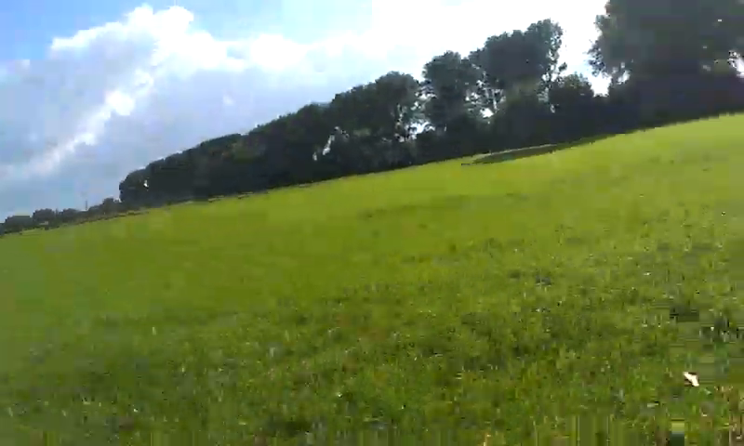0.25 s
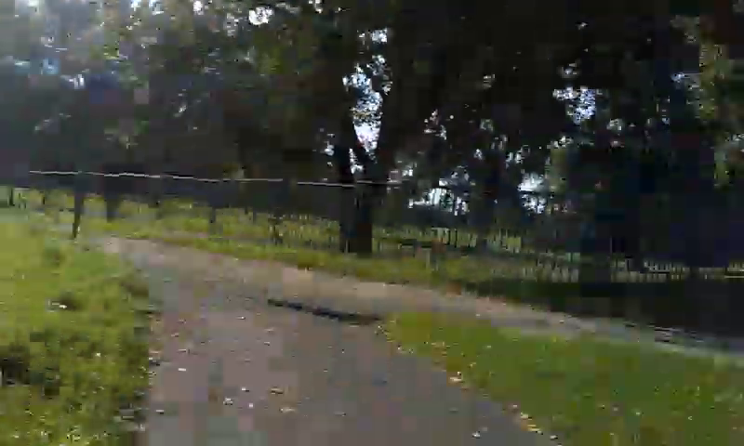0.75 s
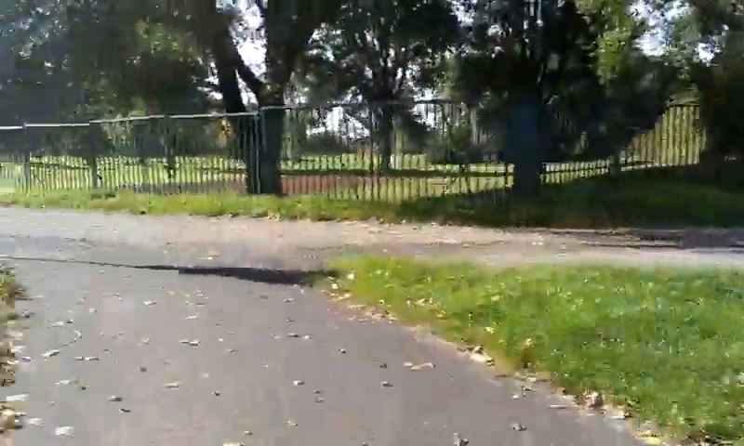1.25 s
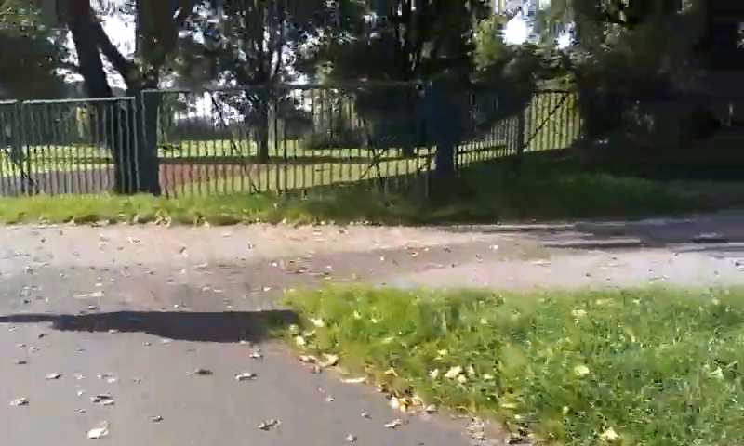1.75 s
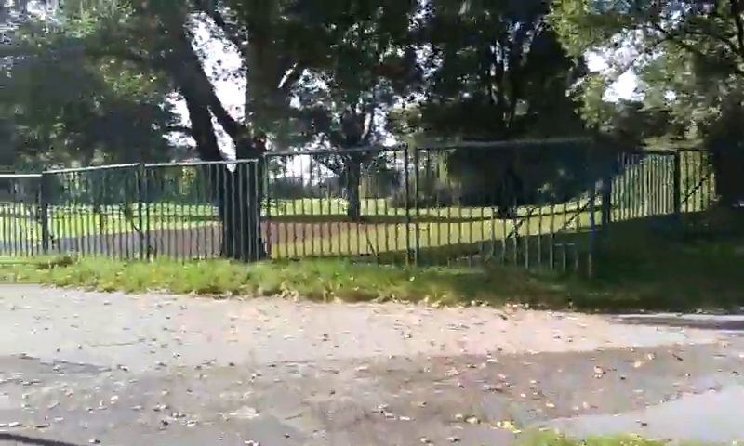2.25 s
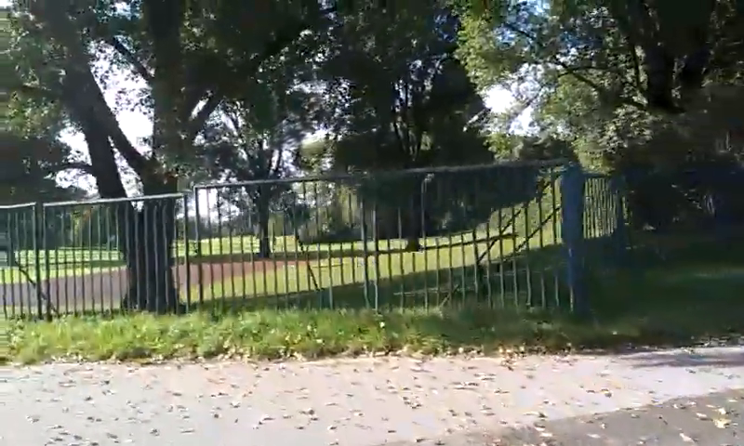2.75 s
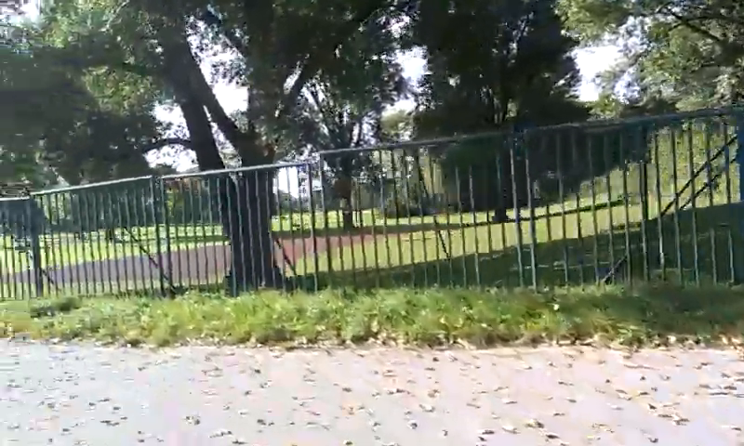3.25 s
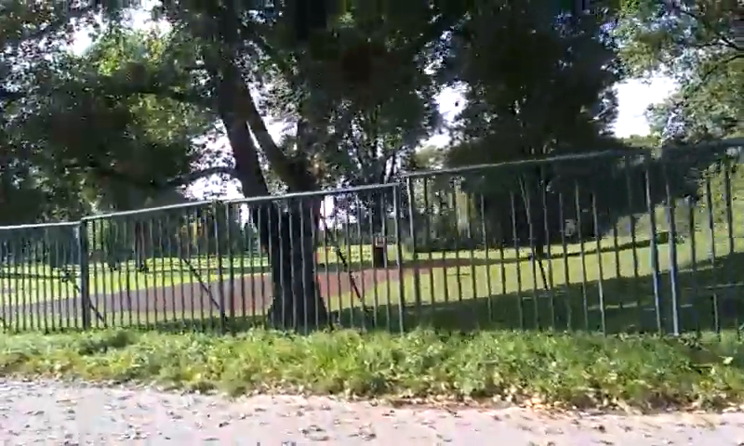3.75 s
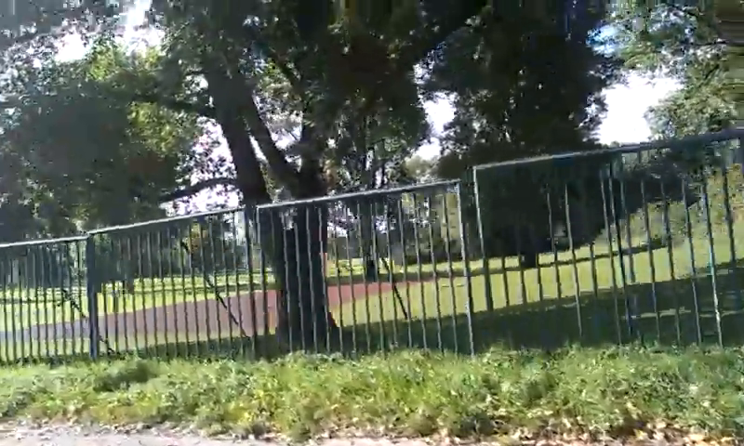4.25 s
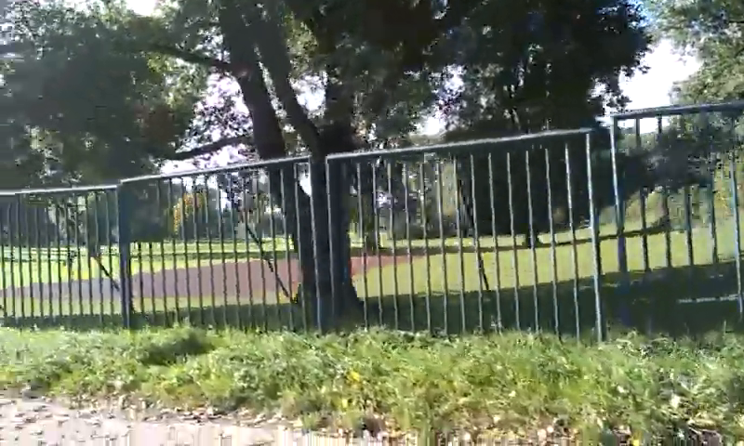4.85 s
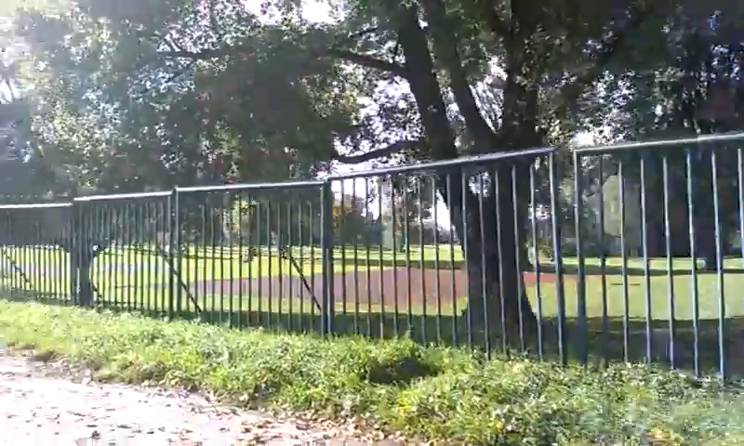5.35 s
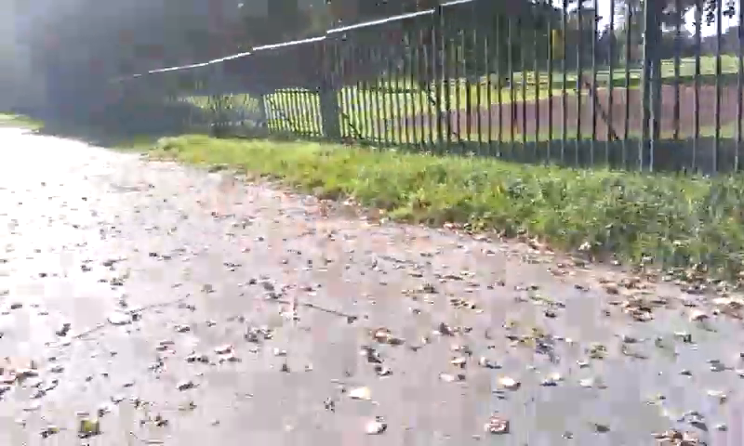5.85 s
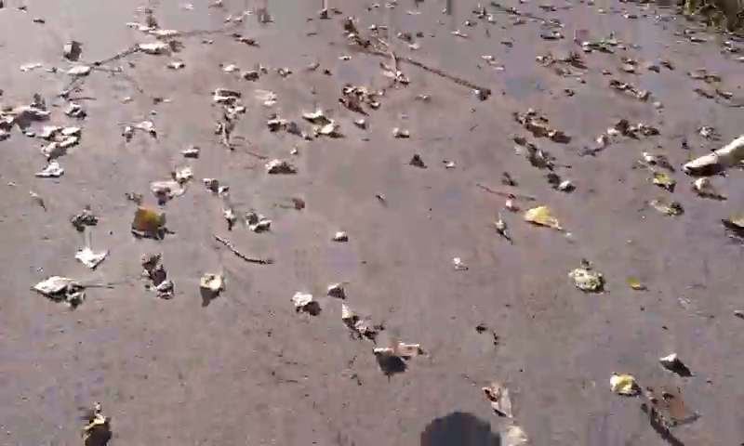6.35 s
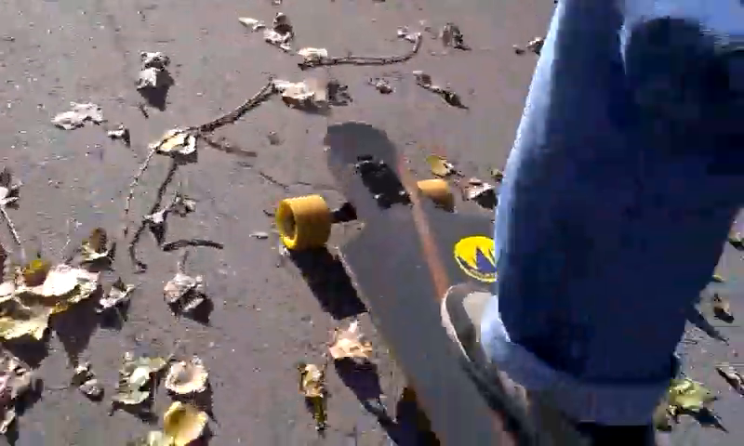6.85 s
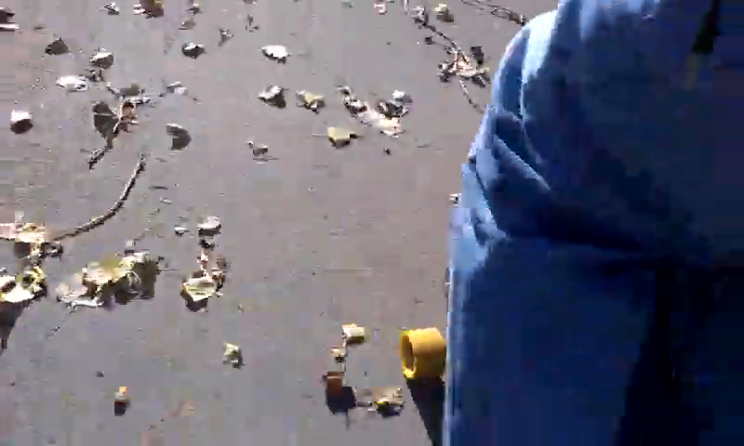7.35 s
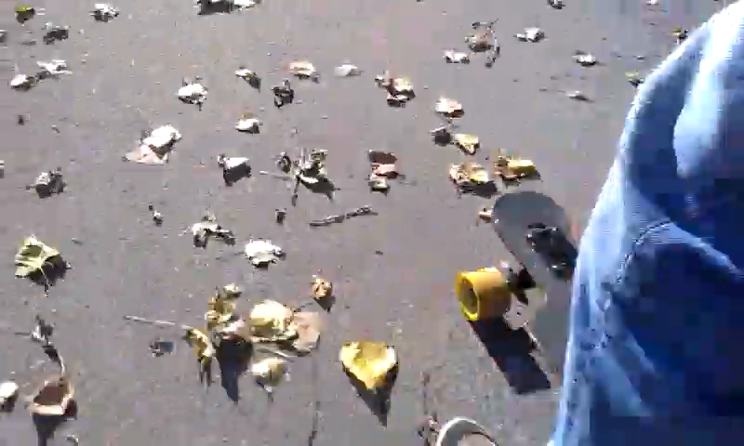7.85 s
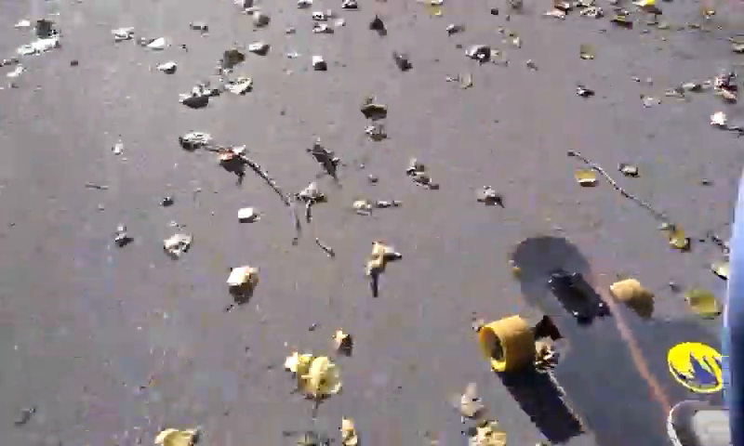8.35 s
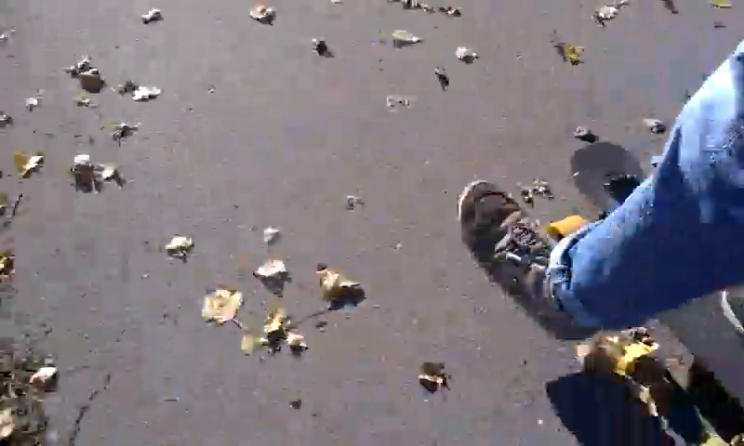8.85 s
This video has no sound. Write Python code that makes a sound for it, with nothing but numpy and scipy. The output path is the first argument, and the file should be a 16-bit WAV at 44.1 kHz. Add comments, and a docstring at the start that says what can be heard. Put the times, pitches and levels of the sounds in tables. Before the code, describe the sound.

Heard from the rider's hand, a skateboard rumbles and hisses over rough asphalt, with light puffs of wind at first. Dry leaves crackle beneath the wheels, and the deck clatters over bumps around the middle. Later the rolling turns louder and hollower, with more knocks and a sharp pebble click, before strong wind thumps and distorts on the microphone, dominating the end.

```python
"""Longboard wheels roll on a leaf-strewn asphalt path, heard from a microphone in the rider's hand.
Stones shake the board into a rumble, grit hisses under the treads, bumps ring the deck,
and dry leaves crunch and snap. Near the end the microphone tips down toward the board,
and wind buffets it until it overloads."""
import sys
import numpy as np
from scipy import signal
from scipy.fft import rfft, irfft, next_fast_len
from scipy.io import wavfile
from scipy.ndimage import uniform_filter1d, map_coordinates

SR = 44100
rng = np.random.default_rng(int(sys.argv[2]) if len(sys.argv) > 2 else 0)


def digitize_waveform(pressure):
    """Quantize a signal to 16-bit integers and store it at the path in sys.argv[1].

    Rows of a 2-D input are taken as channels; values are limited to [-1, 1].
    """
    field = np.atleast_2d(pressure).T
    bounded = np.clip(field, -1, 1)
    quanta = np.round(bounded * 32767).astype(np.int16)
    wavfile.write(sys.argv[1], SR, quanta)


N = 402191
TIME_S = np.arange(N) / SR

# rolling noise: time_s, rumble_db, hiss_db
ROLL_LEVELS = [(0, -34, -41), (.76, -29.5, -35.5), (1.6, -31, -42.5), (2.25, -31, -42), (2.9, -32.5, -44),
               (3.65, -32.5, -41), (4.05, -26, -40), (4.6, -29.5, -41), (4.95, -30, -43),
               (5.45, -34.5, -44), (5.9, -38.5, -43.5), (6.5, -33.5, -38.5), (6.7, -25.5, -30.5),
               (7.05, -30.5, -35.5), (7.5, -29.5, -36), (7.82, -32, -32), (7.93, -20, -29),
               (8.65, -25.5, -35.5), (9.12, -18.5, -31.5)]
# microphone direction, the remainder straight ahead: time_s, aside_share, down_share
MIC_AIM = [(0, 1, 0.072), (1.2, 0.95, 0.0036), (2.1, 0.03, 0.023), (5.4, 0.12, 0.09), (6.0, 0.24, 0.91),
           (6.55, 0.027, 0.98), (9.12, 0.0093, 0.97)]
# brief dips in the hiss: time_s, half_length_s, depth_db
HISS_DIPS = [(6.48, 0.023, 7), (7.485, 0.02, 9), (7.795, 0.047, 6.5)]
# dry leaves under a wheel: start_s, level_db, pitch_hz, length_s
LEAF_CRUNCHES = [(0.575, -15.5, 3570, 0.015), (0.712, -19.5, 6400, 0.012), (1.209, -19, 7340, 0.025),
                 (1.355, -19, 6840, 0.017), (1.921, -19, 3260, 0.023), (2.299, -17, 4200, 0.0086),
                 (2.194, -30, 5000, 0.043), (2.412, -22, 5560, 0.013), (2.592, -37, 5600, 0.017),
                 (2.81, -21.5, 3650, 0.011), (2.8619, -21, 5600, 0.01), (3.083, -22, 6130, 0.019),
                 (3.22, -19.5, 5600, 0.031), (3.26, -21, 3900, 0.021), (3.545, -21.5, 6700, 0.015),
                 (3.669, -11.5, 5300, 0.019), (3.198, -20.5, 7000, 0.01), (3.769, -36, 7000, 0.0084),
                 (3.924, -34, 6500, 0.0094), (4.312, -22, 7000, 0.0098), (4.832, -24, 7200, .012),
                 (4.903, -22.5, 5570, 0.024), (4.931, -23, 4030, 0.018), (5.029, -24.5, 4800, .04),
                 (5.122, -27, 4600, 0.043), (5.248, -24.5, 4600, .018), (5.366, -29, 5500, .02),
                 (5.32, -19.5, 4440, 0.024), (5.511, -19.5, 6140, 0.011), (5.6, -21, 6500, 0.016),
                 (5.686, -18.5, 3700, 0.039), (5.743, -18, 3760, 0.0097), (5.838, -20.5, 5600, 0.033),
                 (6.013, -16.5, 6500, 0.012), (6.225, -17.5, 5400, 0.018), (6.286, -15.5, 5600, 0.032),
                 (6.332, -22, 6900, 0.029), (6.608, -13.5, 5400, 0.013), (7.035, -13, 6760, 0.012),
                 (7.616, -15, 6200, 0.01), (7.729, -17, 5600, 0.016), (7.898, -18, 4400, 0.021),
                 (8.005, -7.5, 5300, 0.0098), (8.256, -11, 6660, 0.019), (8.424, -13, 6950, 0.0082),
                 (8.743, -23, 6500, 0.012), (8.826, -15, 5035, 0.019), (8.911, -15, 4810, 0.021),
                 (8.993, -16, 6430, 0.018), (9.035, -14, 5800, 0.026), (9.088, -7.5, 6160, 0.0093)]
# breaking leaf: freq_hz, gain_db
LEAF_SPECTRUM = [(900, -32), (2100, -12.5), (3000, -7), (3900, 1), (5000, 0.5), (6500, 4.5), (8200, -1.5),
                 (11000, -8.5), (15500, -15)]
# air over the microphone port: freq_hz, gain_db
PORT_SPECTRUM = [(150, -10), (400, 1.5), (750, 0), (1100, -3.5), (1500, -7.5), (2100, -16), (3200, -38),
                 (6000, -48)]


def wheels():
    """Wheels cross coarse and smooth patches that drive rumble, hiss and chatter together."""
    surface = wobble(22)
    return wheel_rumble(surface) + grit_hiss(surface) + truck_chatter(surface)


def wheel_rumble(surface):
    """The asphalt's stones shake the board."""
    # spectrum per microphone direction: freq_hz, gain_db
    aside = [(40, -31), (150, -10.5), (320, -0.5), (430, -4.5), (590, 4), (800, -8.5), (1000, -14.5),
             (1280, -18.5), (1470, -13.5), (1750, -12.5), (2100, -31), (3500, -33)]
    ahead = [(40, -29), (130, -7.5), (230, 0), (340, -0.5), (430, 0), (520, 4.5), (640, 2), (780, -18),
             (1000, -17), (1300, -31), (1560, -21.5), (1900, -58), (2150, -19), (3500, -52)]
    down = [(40, 1.5), (170, -5.5), (300, 6), (420, 1.5), (560, 3), (680, 1), (800, -5.5), (900, -14.5),
            (1250, -10), (1700, -33), (2200, -60), (3500, -35)]
    rumble_db, _ = curves(ROLL_LEVELS)
    stones = grains(per_s=3000, spread_db=3.5) * amp(1.3 * surface)
    return amp(rumble_db - 2.5) * aimed(stones, aside, ahead, down)


def grit_hiss(surface):
    """Fine grit hisses under the treads."""
    # spectrum per microphone direction: freq_hz, gain_db
    aside = [(1500, -37), (2300, -3), (3200, -1.5), (4200, -6.5), (5100, -11), (6100, 4), (6900, 6),
             (8000, -7.5), (9500, -11), (12500, -17), (15500, -40)]
    ahead = [(1500, -10.5), (2400, -12), (3300, -8.5), (4000, -7), (4900, -13), (6300, -7), (7300, 5),
             (8100, -12), (10000, -21.5), (12500, -13.5), (15500, -31)]
    down = [(1500, -28), (2200, 2.5), (3050, 0.5), (3900, -7.5), (4700, 1.5), (5400, 2.5), (6200, -1),
            (7200, 3), (8200, -3), (10500, -12.5), (13500, -16), (15500, -35)]
    _, hiss_db = curves(ROLL_LEVELS)
    patches = amp(1.1 * surface + 1.4 * wobble(90))
    grit = unit(grains(per_s=2500, spread_db=7) + 0.7 * rng.standard_normal(N)) * patches
    hiss = patchy(aimed(grit, aside, ahead, down))
    return amp(hiss_db + 0.14 - dips(HISS_DIPS)) * ground_comb(hiss)


def truck_chatter(surface, smooth_from_s=1.045, smooth_to_s=3.66, edge_s=0.16):
    """Trucks chatter on coarse asphalt; one smooth stretch stills them."""
    # trucks: freq_hz, gain_db
    spectrum = [(500, -21), (800, 11.5), (980, 11.5), (1300, -10), (1600, 1), (1850, -21), (2150, -0.5),
                (3200, -40), (6000, -39)]
    rumble_db, _ = curves(ROLL_LEVELS)
    smooth = np.clip(np.minimum(TIME_S - smooth_from_s, smooth_to_s - TIME_S) / edge_s, 0, 1)
    impacts = grains(per_s=460, spread_db=11) * amp(4.1 * surface)
    return amp(rumble_db - 12 - 37 * smooth) * shaped(impacts, spectrum)


def wheel_ring(fade_from_s=3.8, fade_db_per_s=11, wander=0.012):
    """The wheels' thin ring reaches a microphone pointing ahead, then dies away."""
    # ring: freq_hz, gain_db
    spectrum = [(5500, -36), (6700, -29), (7300, 30), (7650, 0), (8200, -26), (9000, -50)]
    _, hiss_db = curves(ROLL_LEVELS)
    ahead = np.clip(1 - sum(curves(MIC_AIM)), 0, 1)
    flicker = amp(3 * wobble(45) + 2 * wobble(8))
    fade_db = fade_db_per_s * np.maximum(TIME_S - fade_from_s, 0)
    ring = unit(filtered(rng.standard_normal(N), colour(spectrum)) * flicker)
    ring = map_coordinates(ring, [np.cumsum(1 + wander * wobble(22))], order=3, mode="mirror")
    return ahead ** 2 * amp(hiss_db - 1 - fade_db) * ring


def wheel_whirr(width_hz=640, wander=0.025):
    """Two narrow bands in the hiss glide as the microphone moves, wandering and flickering."""
    # gliding bands: time_s, centre_hz, level_db
    low_band = [(0, 5250, -48.5), (.65, 5193, -49), (.85, 5070, -45), (1.3, 5110, -46.5), (1.6, 4930, -51),
                (1.85, 4630, -54), (2.15, 4320, -66), (5.6, 6570, -55), (6.0, 6020, -56), (6.45, 5520, -47),
                (6.7, 5350, -41), (7.1, 5140, -44), (7.6, 4950, -51), (8.0, 5220, -47), (8.5, 5100, -44),
                (9.12, 4980, -48)]
    high_band = [(.4, 9100, -66), (.62, 8400, -50), (.78, 7800, -42), (.98, 7450, -46), (1.3, 7400, -44),
                 (1.45, 6550, -58), (1.8, 6600, -61), (2.2, 6300, -68)]
    lowpass = lambda hz: 1 / (1 + (2 * hz / width_hz) ** 2)
    out = np.zeros(N)
    for band in (low_band, high_band):
        centre_hz, level_db = curves(band)
        phase = 2 * np.pi * np.cumsum(centre_hz * (1 + wander * wobble(9))) / SR
        flicker_db = 1.8 * wobble(20)
        in_phase, quadrature = (filtered(rng.standard_normal(N), lowpass) for _ in range(2))
        whirr = unit(in_phase * np.cos(phase) + quadrature * np.sin(phase))
        out += amp(level_db - 0.5 + flicker_db - dips(HISS_DIPS)) * whirr
    return out


def wheel_roar():
    """From above, the wheels roar on a few hollow, restless notes."""
    # hollow resonances: freq_hz, gain_db
    spectrum = [(580, -36), (635, -7), (677, 1.5), (735, -10), (765, -2), (797, 2.5), (835, -5.5),
                (890, -14), (970, -7), (1080, -15.5), (1290, -21), (1400, -15.5), (1520, -24), (1690, -22),
                (1780, -30), (1900, -22), (2060, -21.5), (2400, -37)]
    # roar: time_s, level_db
    levels = [(5.8, -50), (6.0, -43), (6.25, -44), (6.5, -46), (6.62, -36), (6.76, -26), (6.95, -31.5),
              (7.2, -36.5), (7.4, -31), (7.75, -31), (8.2, -33), (9.12, -28.5)]
    level_db, = curves(levels)
    restless = amp(2.5 * wobble(20))
    return amp(level_db) * shaped(grains(per_s=1400, spread_db=6) * restless, spectrum)


def carve_swish(centre_s=0.82, width_s=0.21, level_db=-41):
    """The hiss brightens briefly as the board carves onto the path."""
    # swish: freq_hz, gain_db
    spectrum = [(6000, -35), (6900, 8), (7700, -1), (8700, 1), (10500, -28)]
    swell = np.exp(-0.5 * ((TIME_S - centre_s) / width_s) ** 2)
    return amp(level_db) * swell * shaped(rng.standard_normal(N), spectrum)


def bumps():
    """Wheels clatter over seams and twigs and ring the deck."""
    # knocks: start_s, level_db, pitch_hz, length_s
    knocks = [(0.243, -19, 573, 0.013), (0.335, -9.5, 900, 0.0057), (1.412, -16, 288, 0.016),
              (1.781, -15.5, 340, 0.0077), (3.247, -18, 507, 0.012), (3.543, -14.5, 615, 0.021),
              (3.722, -12, 580, 0.021), (3.874, -12, 600, 0.014), (3.99, -7, 496, 0.017),
              (4.021, -12.5, 447, 0.014), (4.045, -8.5, 528, 0.011), (4.229, -9.5, 590, 0.017),
              (4.297, -8.5, 630, 0.027), (4.475, -10, 650, 0.0026), (4.599, -15, 546, 0.015),
              (4.795, -17, 541, 0.016), (4.874, -16, 506, 0.0082), (5.529, -19, 685, 0.017),
              (5.749, -12, 490, 0.01), (6.81, -14, 900, 0.0096), (6.835, -10, 604, 0.0034),
              (6.856, -8.5, 630, 0.0058), (6.947, -10.5, 760, 0.0072), (7.042, -4.5, 700, 0.0083),
              (7.084, -10, 626, 0.023), (7.27, -13, 820, 0.009), (7.366, -6, 745, 0.017),
              (7.549, -12, 720, 0.0062), (8.59, -10, 797, 0.0099)]
    # deck and truck modes: mode_hz, width_hz, gain_db
    modes = [(225, 210, -8), (497, 167, 2), (719, 145, 0), (933, 230, -8.5), (1740, 70, -28.5),
             (2054, 180, -23)]

    def deck(hz):
        return sum((-1) ** k * amp(db) * 1j * hz * width_hz / (mode_hz**2 - hz**2 + 1j * hz * width_hz)
                   for k, (mode_hz, width_hz, db) in enumerate(modes))

    rows = [(start_s, length_s, db - 8, hz) for start_s, db, hz, length_s in knocks]
    return bursts(rows, deck, centre_hz=533, lean=0.9, per_s=490,
                  tail=0.4, ring_db=-8, rise_s=0.00093, bed=0.088)


def deck_thud(start_s=5.751, level_db=-17, pitch_hz=245, t60_s=0.093):
    """One heavy jolt bends the deck and sounds its lowest mode."""
    t = np.maximum(TIME_S - start_s, 0)
    attack = 1 - np.exp(-t / 0.00084)
    return amp(level_db - 60 * t / t60_s) * attack * np.sin(2 * np.pi * pitch_hz * t)


def pebble_clicks(pitch_hz=1686, t60_s=0.022):
    """Pebbles and twigs crack against the board and ring; hard hits wake an upper mode."""
    # hits: start_s, level_db
    hits = [(0.245, -22.5), (0.3484, -23), (3.549, -28), (4.0026, -22), (4.305, -32), (5.537, -29),
            (6.8122, -10.5), (7.046, -30), (7.368, -17), (7.488, -35), (7.949, -15)]
    # crack: freq_hz, gain_db
    spectrum = [(600, -20), (1300, 7), (2100, 10), (3400, -9), (6000, -41)]
    out, t = np.zeros(N + SR), np.arange(SR // 20) / SR
    attack = 1 - np.exp(-t / 0.00022)
    for start_s, db in hits:
        phase = 2 * np.pi * pitch_hz * np.exp(0.013 * rng.standard_normal()) * t
        ring = np.sin(phase) + amp(0.5 * (db + 9)) * np.sin(1.776 * phase)
        crack = np.exp(-t / 0.0026) * shaped(rng.standard_normal(len(t)), spectrum)
        out[round(start_s * SR):][:len(t)] += amp(db - 60 * t / t60_s) * attack * (ring + 1.05 * crack)
    return out[:N]


def leaf_scraps():
    """Scraps of leaf crackle in clumps and brittle specks tick, following the hiss level."""
    hiss_db = curves(ROLL_LEVELS)[1] - dips(HISS_DIPS)
    clumps = amp(6 * np.clip(wobble(70), -3, 2))
    scraps = shaped(clumps * grains(per_s=350, spread_db=1.5), LEAF_SPECTRUM)
    specks = ticks(per_s=45, centre_hz=6500, scatter=0.7, decay_cycles=4)
    return amp(hiss_db - 8.5) * scraps + amp(hiss_db - 16) * specks


def leaves(snap_s=0.002):
    """Whole leaves crunch under the wheels; stiff ones snap, small ones at random."""
    # stiff leaves and stalks breaking: start_s, level_db, pitch_hz
    breaks = [(0.313, -19, 4460), (0.404, -16.5, 4230), (0.583, -15, 5540), (1.33, -18, 6500),
              (1.825, -22, 6500), (1.93, -12.5, 3570), (1.934, -15, 5550), (2.302, -9, 4050),
              (2.309, -19, 10000), (2.455, -20, 3900), (2.818, -16, 3920), (2.861, -19, 5530),
              (3.234, -20, 5460), (3.263, -13, 3800), (3.43, -15, 6550), (3.682, -11, 4450),
              (3.886, -17, 6060), (4.951, -13.5, 4100), (5.012, -18, 5300), (5.083, -24, 3100),
              (5.3, -27, 4200), (5.322, -13, 4450), (5.595, -16, 6360), (5.701, -12, 3800),
              (5.719, -16, 4200), (5.752, -17, 3860), (5.7566, -6, 3820), (5.959, -25, 5500),
              (6.018, -12, 6500), (6.229, -11.5, 5460), (6.332, -13, 7500), (7.038, -22, 9530),
              (7.899, -8.5, 4610), (8.012, -6, 5600), (8.263, -10, 9500), (8.421, -13, 8500),
              (8.427, -16, 8000), (8.553, -15, 9020), (8.597, -14.5, 8520), (8.618, -17, 9570),
              (8.83, -13, 8600), (8.996, -10, 9100), (9.094, -9, 8500)]
    hiss_db = curves(ROLL_LEVELS)[1] - dips(HISS_DIPS)
    aside, down = curves(MIC_AIM)
    litter_db = hiss_db - 4 * aside + 2 * down + 4.5
    whole = [(start_s, length_s, db - 13, hz) for start_s, db, hz, length_s in LEAF_CRUNCHES]
    stiff = [(start_s, snap_s, db - 10.5, hz) for start_s, db, hz in breaks]
    small = strewn(per_s=24, level_db=litter_db, spread_db=9, length_s=0.0028, pitch_hz=7200)
    crunches = bursts(whole, colour(LEAF_SPECTRUM), centre_hz=5300, lean=0.57, per_s=1500,
                      tail=0.36, ring_db=2, rise_s=0.0016, bed=0.1)
    snaps = bursts([*stiff, *small], colour(LEAF_SPECTRUM), centre_hz=5300, lean=2.1, per_s=4000,
                   tail=0.7, ring_db=7, rise_s=0.0001)
    return crunches + snaps


def leaf_splinters(per_s=280, scatter=0.56):
    """Each crushed leaf breaks in a cluster of tiny, uneven snaps of scattered pitch."""
    out, t = np.zeros(N + SR), np.arange(SR // 12) / SR
    for start_s, db, pitch_hz, length_s in LEAF_CRUNCHES:
        early, late, size, pitch = rng.random((int(per_s * length_s) + 3, 4)).T[:, :, None]
        age_s = np.maximum(t - 0.75 * length_s * (early + late), 0)
        cycles = age_s * pitch_hz * np.exp(scatter * (2 * pitch - 1))
        snaps = amp(-6 * np.log(size + 0.1)) * np.sin(2 * np.pi * cycles) * np.exp(-cycles / 2.8)
        out[round(start_s * SR):][:len(t)] += levelled(snaps.sum(axis=0), db - 19, length_s)
    return out[:N]


def wind(soft_db=-20, hard_db=-11, shelter=0.91):
    """Light air thuds softly on the microphone; strong air blasts in lumps and flutters."""
    # wind strength: time_s, level_db
    levels = [(0, -31), (.25, -30), (.6, -42.5), (.92, -35), (1.35, -32.5), (1.8, -29.5), (2.25, -44.5),
              (3.1, -47), (4.3, -38), (5.6, -52), (6.55, -44.5), (6.72, -32), (7.1, -26), (7.28, -28),
              (7.42, -22.5), (7.53, -17.5), (7.8, -20.5), (7.99, -11), (8.25, -10.5), (8.56, -15),
              (8.8, -11.5), (9.12, -19)]
    # momentary drops: time_s, half_length_s, depth_db
    lulls = [(7.135, .018, 5), (7.24, 0.024, -2), (7.47, .014, 2), (7.59, .014, -2), (7.697, 0.021, 5),
             (8.075, 0.022, 15), (8.195, 0.016, 1.5), (8.47, 0.016, 5.5), (8.632, 0.049, 23),
             (8.73, 0.015, 6), (8.895, 0.025, 4.5), (8.938, 0.011, 5), (8.994, 0.013, 4)]
    # short gusts: start_s, length_s, level_db, pitch_hz
    gusts = [(7.078, 0.025, -15.5, 150), (7.158, 0.0097, -14, 220), (7.183, 0.012, -13.5, 260),
             (7.314, 0.017, -13, 320), (7.362, 0.03, -10, 256), (7.492, 0.017, -17, 170),
             (7.552, 0.0058, -16, 320), (7.852, 0.024, -5.5, 320), (7.958, 0.015, -4.5, 330),
             (8.013, 0.011, -6, 252), (8.044, 0.014, -5, 220), (8.112, 0.017, -8, 242),
             (8.138, .02, -8.5, 249), (8.21, .028, -8.5, 290), (8.302, .0125, -10, 240),
             (8.37, 0.02, -7, 359), (8.42, .015, -4, 260), (8.487, 0.026, -12.5, 340),
             (8.674, 0.025, -7, 300), (8.962, 0.0076, -6.5, 340)]
    # eddies in light wind, strong wind and gusts: freq_hz, gain_db
    breeze_spectrum = [(12, -21), (28, 1), (50, 5), (80, 2.5), (140, -0.5), (230, -7), (400, -21),
                       (900, -58), (2000, -65)]
    blast_spectrum = [(15, -55), (45, -22), (100, -4), (150, -1), (195, 3), (250, -1.5), (350, -5.5),
                      (550, -10), (850, -13), (1300, -41), (2200, -67), (4000, -68)]
    gust_spectrum = [(20, -51), (90, -9), (200, 1), (350, -4), (700, -8.5), (1300, -29.5), (2200, -82),
                     (4500, -77)]
    steady_db, = curves(levels)
    wind_db = steady_db - dips(lulls)
    aside, _ = curves(MIC_AIM)
    hardness = np.interp(steady_db, [soft_db, hard_db], [0.35, 1]) * (1 - shelter * aside)
    puffs = amp(3.5 * np.clip(wobble(18), -2, 1.2))
    breeze = shaped(rng.standard_normal(N) * puffs, breeze_spectrum)
    blast = shaped(rng.standard_normal(N) * amp(2.46 * wobble(70)), blast_spectrum)
    weak_gusts = strewn(per_s=12, level_db=wind_db + 3.5, spread_db=1.5, length_s=0.004, pitch_hz=250)
    eddies = bursts([*gusts, *weak_gusts], colour(gust_spectrum), centre_hz=305, lean=1.6, per_s=900,
                    tail=0.18, ring_db=-16, rise_s=0.00032)
    flow = np.sqrt(1 - hardness) * breeze + np.sqrt(hardness) * blast
    pressure = amp(wind_db + 0.5) * flow + amp(-1.5) * eddies
    return pressure + port_flutter(pressure)


def port_flutter(pressure, crack_share=0.3):
    """Fast air flutters over the microphone port and cracks at each pressure crest."""
    # flutter against wind pressure: time_s, relative_db
    levels = [(7.72, -35), (7.9, -9.5), (8.08, -15.5), (8.4, -13), (8.92, -9.5), (9.06, -0.5)]
    flutter_db, = curves(levels)
    envelope = np.abs(pressure) * amp(3 * np.clip(wobble(140), -2, 1.8))
    crests = signal.find_peaks(pressure, distance=SR // 400)[0]
    sizes = pressure[crests] * rng.choice([-1, 1], len(crests)) * amp(rng.uniform(-4, 4, len(crests)))
    cracks = unit(np.bincount(crests, sizes, N))
    rush = unit(rng.standard_normal(N) * envelope)
    air = np.sqrt(crack_share) * cracks + np.sqrt(1 - crack_share) * rush
    return amp(flutter_db + 4.5) * np.std(pressure) * shaped(air, PORT_SPECTRUM)


def eddy_thumps(decay_cycles=0.35):
    """An eddy pushes the diaphragm and lets go: about one cycle with a steep front."""
    # single eddies: centre_s, level_db, pitch_hz
    eddies = [(1.9, -16.5, 250), (7.079, -11, 250), (7.413, -3.5, 277), (7.436, -3, 195), (7.459, -13, 330),
              (7.506, -1.5, 191), (7.535, -1, 159), (7.613, 2, 160), (7.735, -0.5, 149), (7.978, 6, 190),
              (7.991, -6, 171), (8.049, -2, 170), (8.062, 3, 220), (8.09, -4, 228), (8.149, 5, 190),
              (8.221, 1.5, 239), (8.266, 1, 170), (8.303, -3.5, 209), (8.435, 2.5, 240), (8.638, 2.5, 249),
              (8.697, 2, 179), (8.769, -3, 200), (8.796, -1, 281.2), (8.857, -10, 230), (8.872, -1, 260),
              (8.968, 1.5, 147)]
    out, t = np.zeros(N + SR), np.arange(-SR // 40, SR // 40) / SR
    for centre_s, db, pitch_hz in eddies:
        cycles = t * pitch_hz
        steepened = cycles + 0.057 * np.tanh(cycles / 0.058)
        push = np.sin(2 * np.pi * steepened) * np.exp(-np.abs(cycles) / decay_cycles)
        out[round((centre_s + t[0]) * SR):][:len(t)] += rng.choice([-1, 1]) * amp(db + 1.5) * push
    return out[:N]


def port_slaps(length_s=0.0072, pitch_hz=850):
    """The fastest air rattles the port in short, hard slaps."""
    # slaps: start_s, level_db
    slaps = [(7.316, -15), (7.488, -11.5), (7.528, -27), (7.863, 2), (7.966, 3.5), (7.985, 1), (7.908, -4),
             (8.147, -4), (8.212, 0), (8.232, -3), (8.258, -5), (8.347, -2), (8.375, 2), (8.408, -3),
             (8.429, 0), (8.471, -6), (8.493, -3), (8.529, -8), (8.543, -17), (8.634, -3), (8.674, -3),
             (8.694, -2), (8.756, -3), (8.792, -3), (8.823, -1), (8.841, -2), (8.869, -7), (8.918, -1),
             (8.952, -3.5), (8.965, -9), (9.011, 0.5), (9.028, -4), (9.047, -1), (9.082, 2.5), (9.113, 6)]
    rows = [(start_s, length_s, db - 9.5, pitch_hz) for start_s, db in slaps]
    return bursts(rows, colour(PORT_SPECTRUM), centre_hz=830, lean=1, per_s=1100,
                  tail=0.25, ring_db=-8, rise_s=0.0003, bed=0.08)


def ground_comb(x):
    """The asphalt's late, dulled, inverted reflection combs x; the comb sweeps as the hand moves."""
    # extra travel time: time_s, delay_ms
    delays = [(0, .465), (.55, .44), (.8, .485), (1.35, .49), (1.85, .545), (5.3, .36), (6.65, .478),
              (7.7, .503), (9.12, .485)]
    delay_ms, = curves(delays)
    aside, down = curves(MIC_AIM)
    strength = 0.39 * np.sqrt(aside) + 0.3 * down
    dulled = filtered(x, colour([(7000, -2.5), (11000, -8)]))
    late = map_coordinates(dulled, [np.arange(N) - delay_ms * SR / 1000], order=3)
    return (x - strength * late) / np.sqrt(1 + strength ** 2)


def aimed(x, *spectra):
    """Blend x through the aside, ahead and down spectra as the microphone turns."""
    aside, down = curves(MIC_AIM)
    shares = aside, np.clip(1 - aside - down, 0, 1), down
    return sum(np.sqrt(share) * shaped(x, spectrum) for share, spectrum in zip(shares, spectra))


def patchy(x, depth_db=1.9, width_hz=500, life_s=0.18):
    """Shift the colour of x in broad, slow patches."""
    frames = signal.stft(x, nperseg=512)[2]
    field = rng.standard_normal(frames.shape)
    size = round(width_hz * 512 / SR), round(life_s * SR / 256)
    for axis in (0, 1, 0, 1):
        field = uniform_filter1d(field, size[axis], axis)
    return unit(signal.istft(frames * amp(depth_db * unit(field)), nperseg=512)[1][:N])


def bursts(rows, body, centre_hz, lean, per_s, tail, ring_db, rise_s, bed=0.16):
    """Volleys of impacts over a noise bed strike a body, leaning bright or dull with their pitch."""
    out, lead = np.zeros(N + SR), SR // 50
    t = (np.arange(SR // 6) - lead) / SR
    for start_s, length_s, db, pitch_hz in rows:
        force = np.exp(np.minimum(t, 0) / rise_s - np.maximum(t - 1.04 * length_s, 0) / (tail * length_s))
        volley = force * rng.standard_normal(len(t)) * (bed + (rng.random(len(t)) < per_s / SR))
        slope = lean * np.log(pitch_hz / centre_hz)
        ring_hz = pitch_hz * np.exp(0.082 * rng.standard_normal())
        ring = lambda hz: 1 + amp(ring_db) / (1 + 14j * (hz / ring_hz - 1))
        sound = filtered(volley, lambda hz: body(hz) * ring(hz) * np.clip(hz / centre_hz, .25, 4) ** slope)
        out[max(round(start_s * SR) - lead, 0):][:len(t)] += levelled(sound, db, length_s)
    return out[:N]


def strewn(per_s, level_db, spread_db, length_s, pitch_hz):
    """Random events under a level curve: start_s, length_s, level_db, pitch_hz."""
    when, size, span, pitch = rng.random((int(per_s * N / SR), 4)).T
    db = level_db[(when * N).astype(int)] - spread_db * size
    return np.transpose([when * N / SR, length_s * (0.5 + span), db, pitch_hz * 2 ** (pitch / 2 - 0.25)])


def ticks(per_s, centre_hz, scatter, decay_cycles):
    """Tiny random snaps, each ringing at its own pitch; rms 1."""
    when, pitch, size = rng.random((int(per_s * N / SR), 3)).T[:, :, None]
    k = np.arange(SR // 50)
    cycles = centre_hz * np.exp(scatter * (2 * pitch - 1)) * k / SR
    snaps = amp(-6 * np.log(size + 0.11)) * np.sin(2 * np.pi * cycles) * np.exp(-cycles / decay_cycles)
    positions = (when * N).astype(int) + k
    return unit(np.bincount(positions.ravel(), snaps.ravel(), N + SR)[:N])


def grains(per_s, spread_db):
    """Tiny random impacts of uneven size; rms 1."""
    hits = (rng.random(N) < per_s / SR) * np.sign(rng.standard_normal(N))
    return unit(hits * amp(spread_db * np.clip(rng.standard_normal(N), -2, 2)))


def wobble(knots_per_s):
    """Smooth random curve."""
    knots = rng.standard_normal(int(N * knots_per_s / SR) + 4)
    return map_coordinates(knots, [TIME_S * knots_per_s])


def dips(rows):
    """Decibels lost in brief, smooth dips."""
    return sum(db * np.exp(-((TIME_S - time_s) / half_s) ** 2) for time_s, half_s, db in rows)


def curves(rows):
    """One value per sample for each column after time_s."""
    time_s, *columns = np.transpose(rows)
    return [np.interp(TIME_S, time_s, column) for column in columns]


def colour(spectrum):
    """Frequency response through points of freq_hz, gain_db."""
    freq_hz, gain_db = np.transpose(spectrum)
    return lambda hz: amp(np.interp(np.log(hz + 1), np.log(freq_hz), gain_db))


def filtered(x, response):
    """x through a frequency response."""
    size = next_fast_len(len(x) + 4096)
    return irfft(rfft(x, size) * response(np.fft.rfftfreq(size, 1 / SR)), size)[:len(x)]


def shaped(x, spectrum):
    """x through a spectrum table; rms 1."""
    return unit(filtered(x, colour(spectrum)))


def levelled(x, rms_db, length_s):
    """x with the energy of rms_db held for length_s."""
    return x * amp(rms_db) * np.sqrt(length_s * SR / np.sum(x ** 2))


def unit(x):
    """x at rms 1."""
    return x / np.sqrt(np.mean(x ** 2) + 1e-20)


def amp(db):
    """Decibels to gain."""
    return 10 ** (np.asarray(db) / 20)


def scene():
    """Board, leaves and wind at one microphone."""
    rolling = wheels() + wheel_ring() + wheel_whirr() + wheel_roar() + carve_swish()
    knocks = bumps() + deck_thud() + pebble_clicks()
    litter = leaf_scraps() + leaves() + leaf_splinters()
    air = wind() + eddy_thumps() + port_slaps()
    return (rolling + knocks + litter + air)[None]


def record(dry):
    """The strongest gusts overload the microphone; a band limit cuts the top treble."""
    top_hz = 15750
    saturated = dry[0] / (1 + np.abs(dry[0]) ** 6) ** (1 / 6)
    return filtered(saturated, lambda hz: hz < top_hz)[None]


dry = scene()
out = record(dry)
digitize_waveform(out)
```